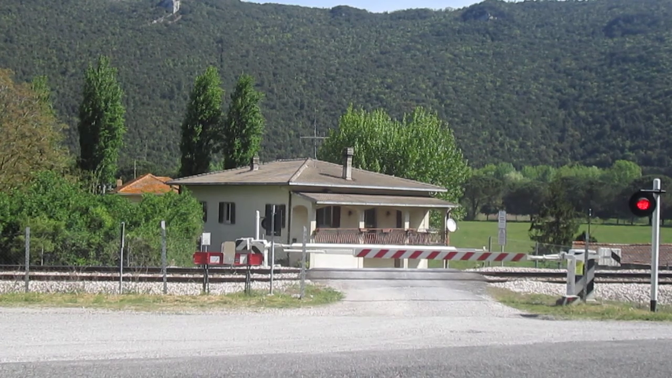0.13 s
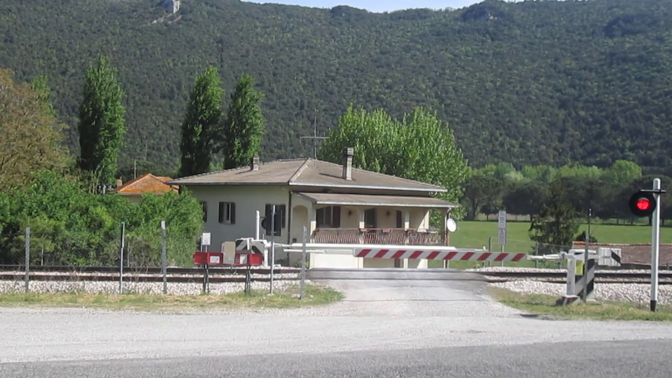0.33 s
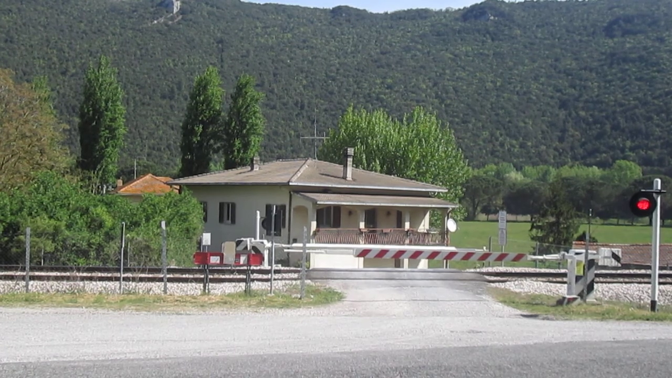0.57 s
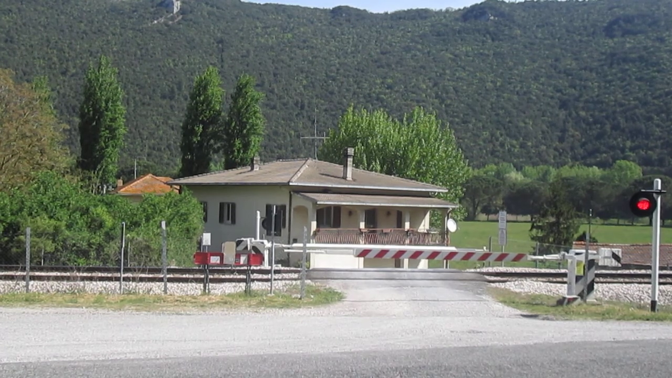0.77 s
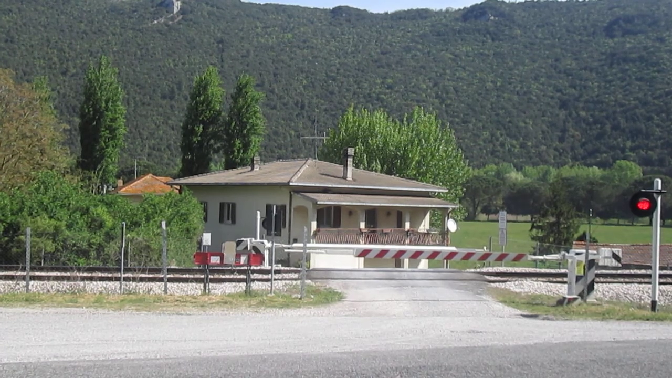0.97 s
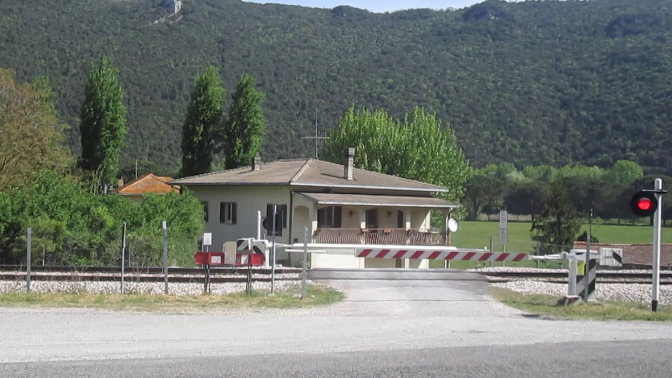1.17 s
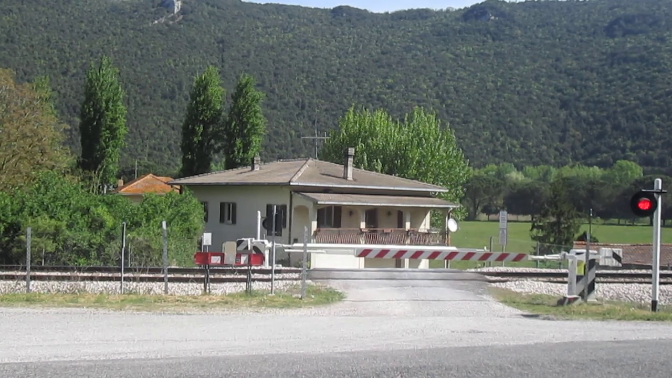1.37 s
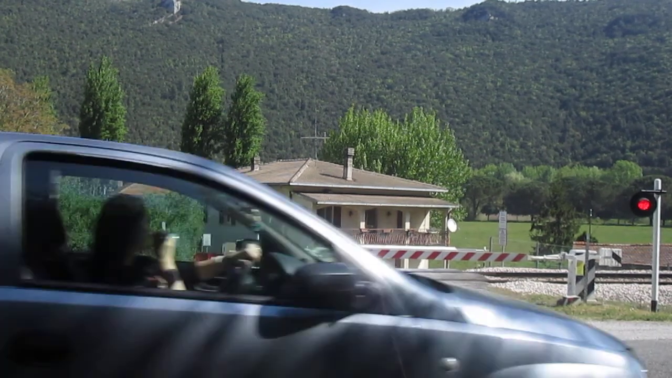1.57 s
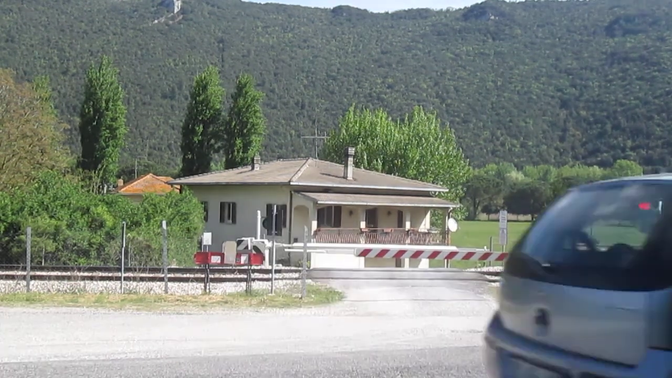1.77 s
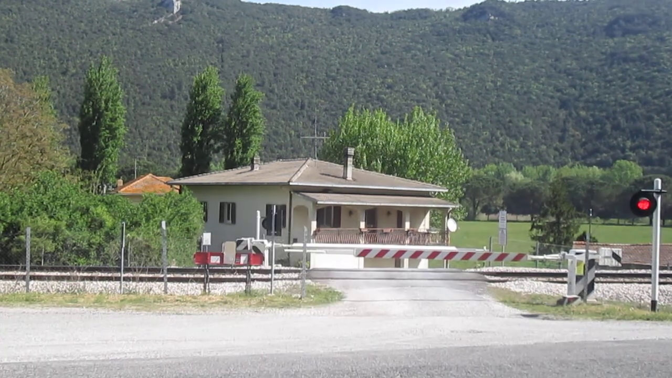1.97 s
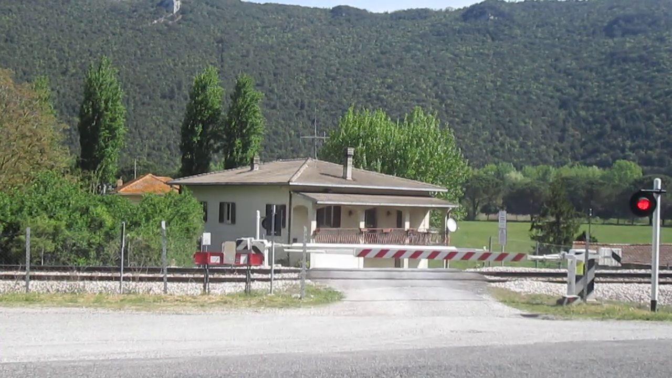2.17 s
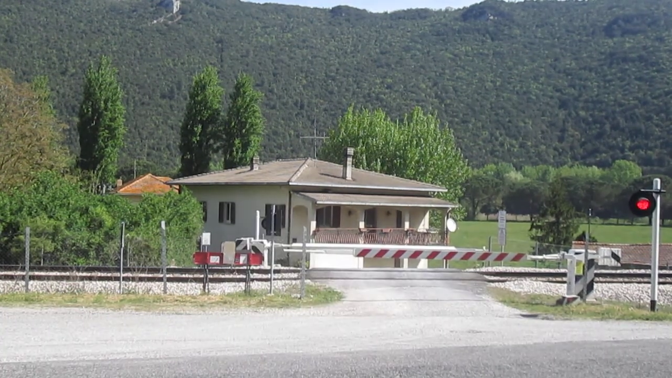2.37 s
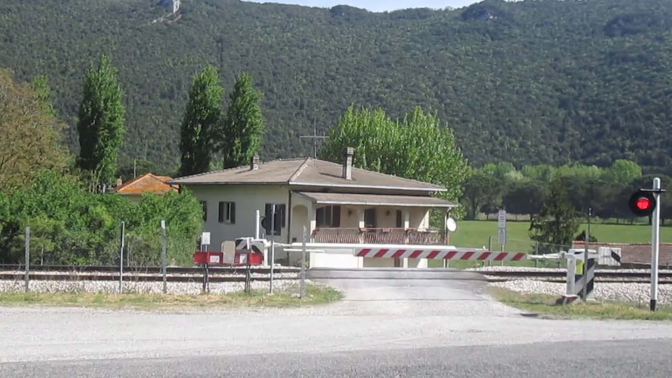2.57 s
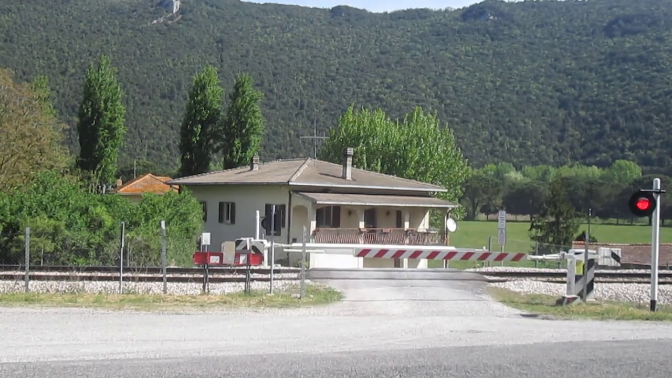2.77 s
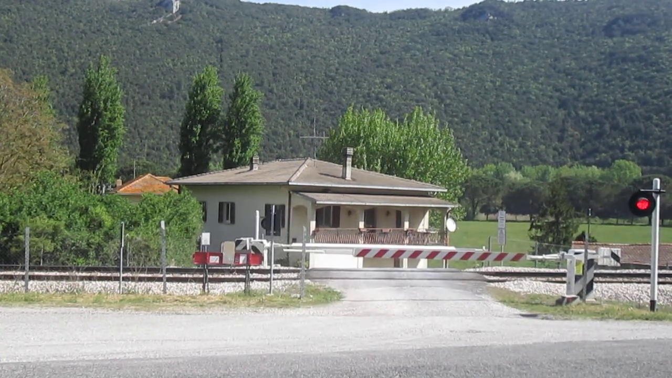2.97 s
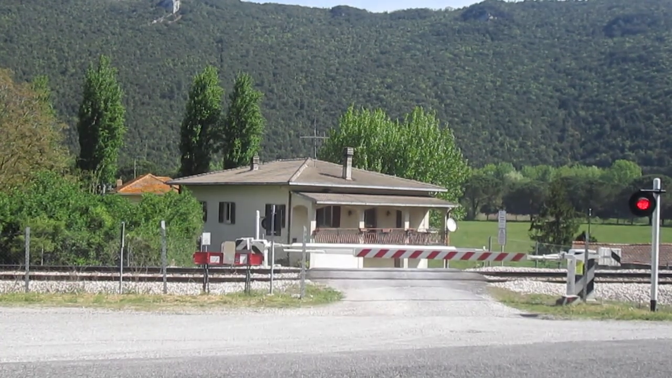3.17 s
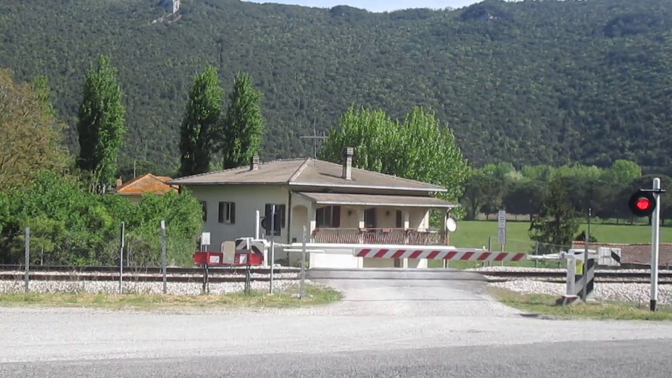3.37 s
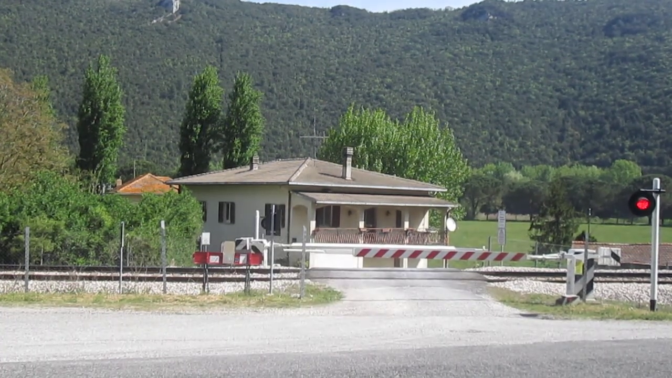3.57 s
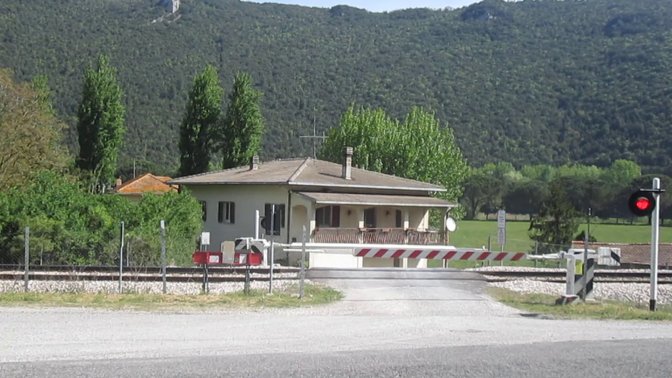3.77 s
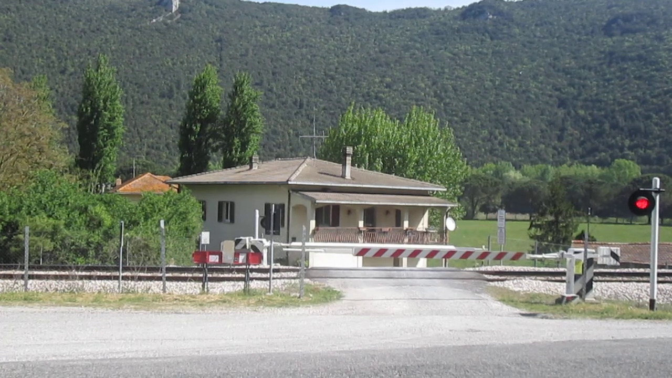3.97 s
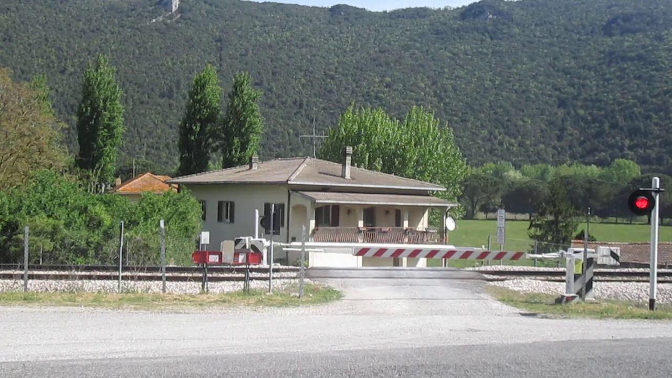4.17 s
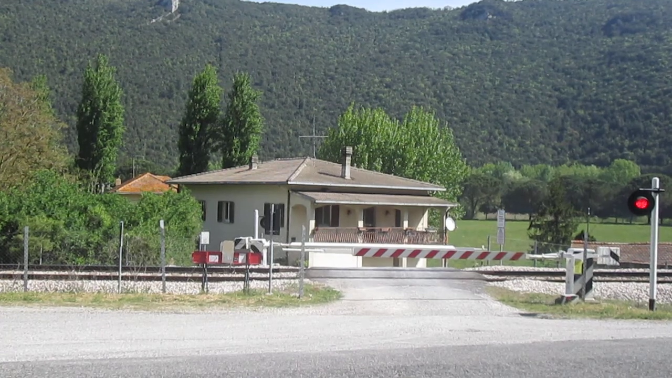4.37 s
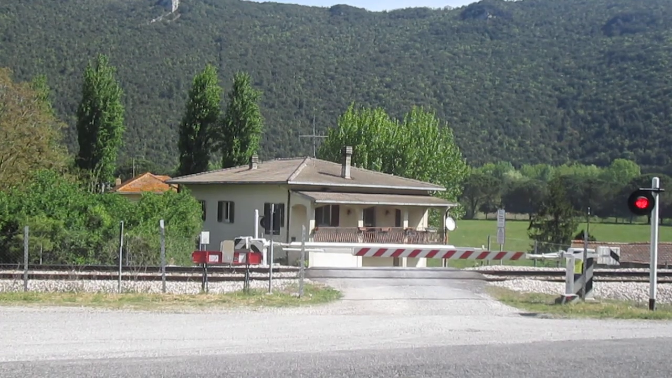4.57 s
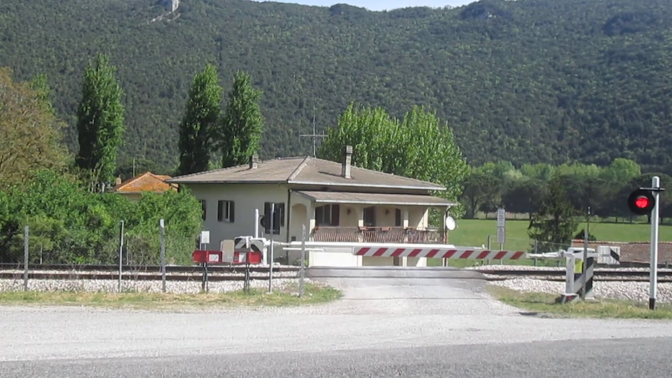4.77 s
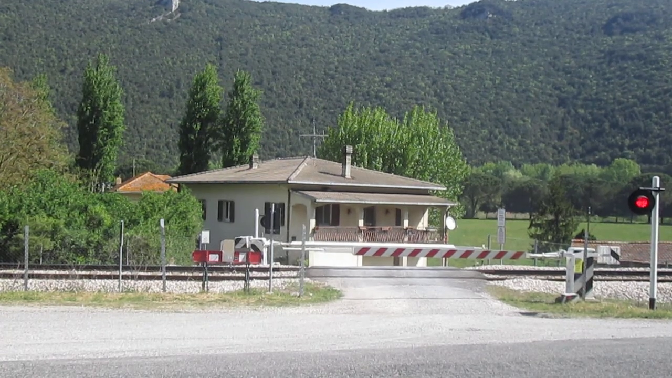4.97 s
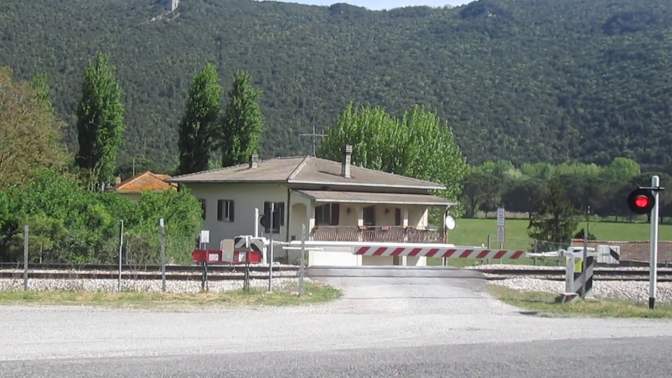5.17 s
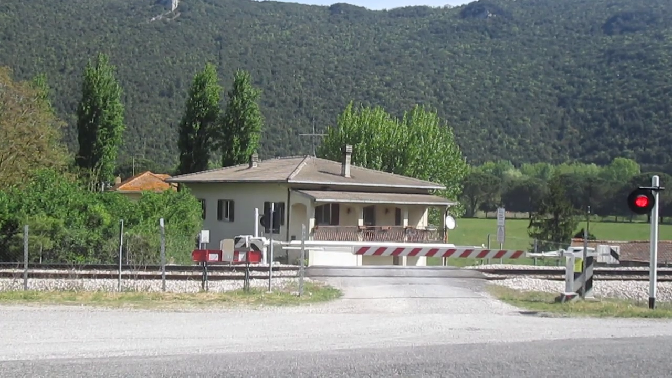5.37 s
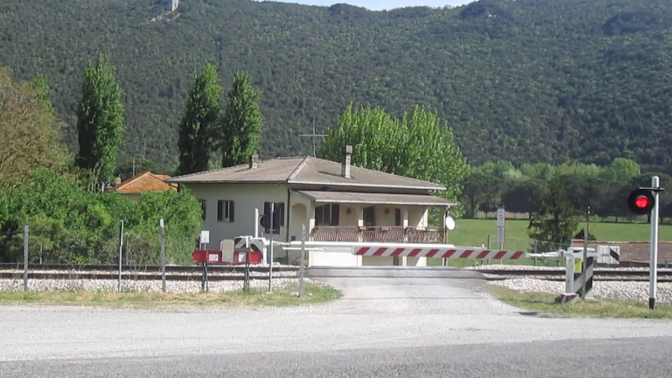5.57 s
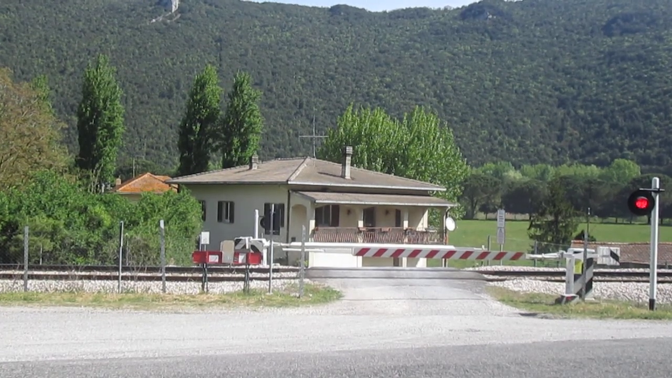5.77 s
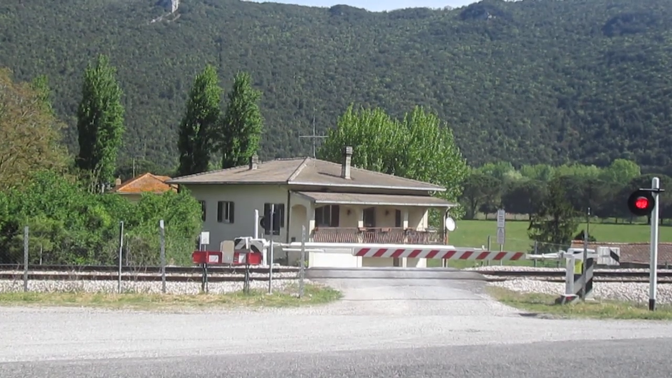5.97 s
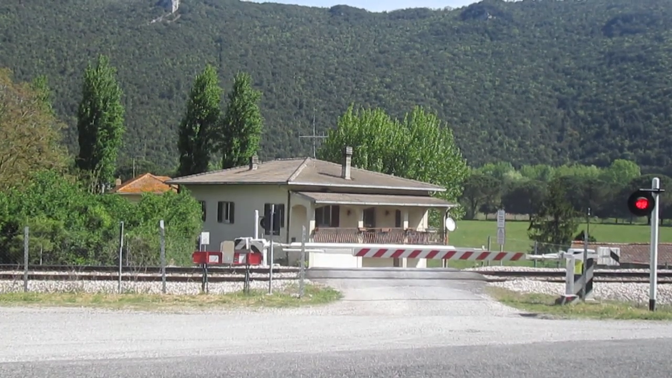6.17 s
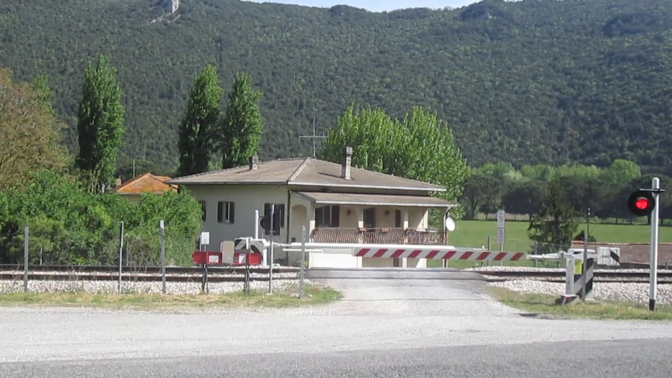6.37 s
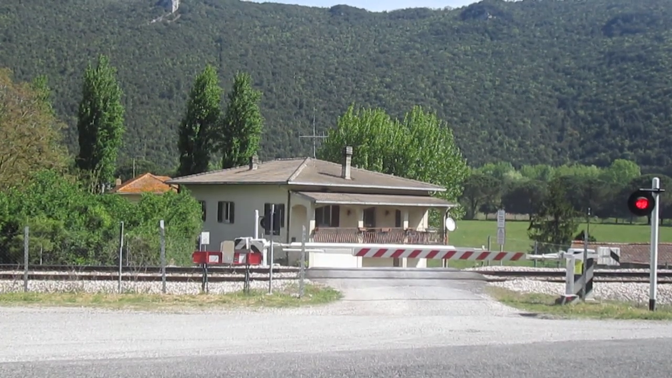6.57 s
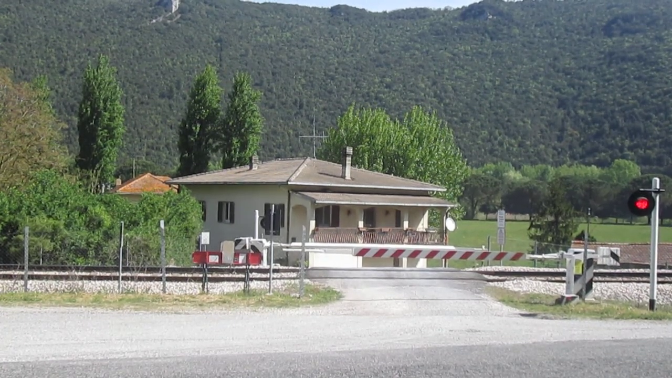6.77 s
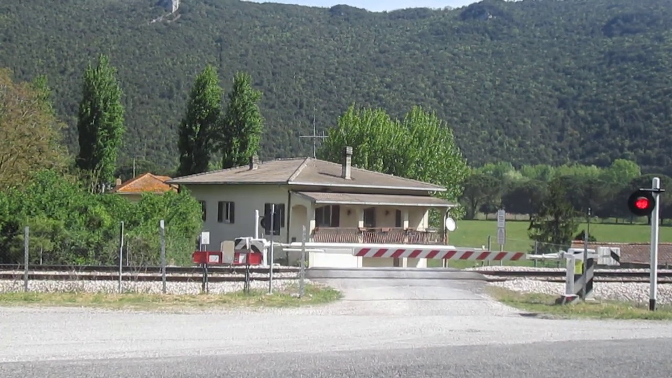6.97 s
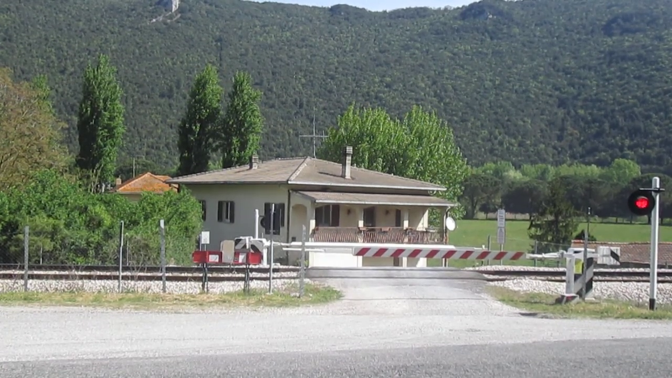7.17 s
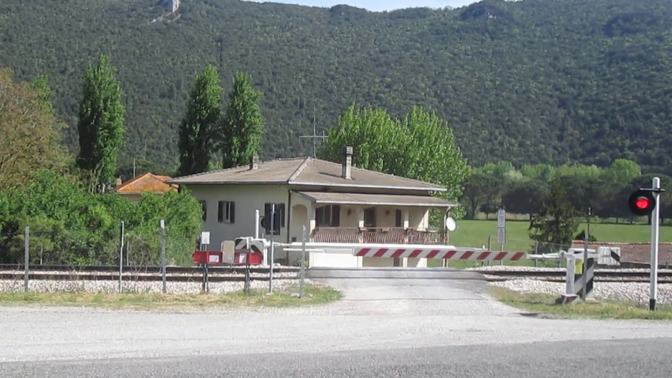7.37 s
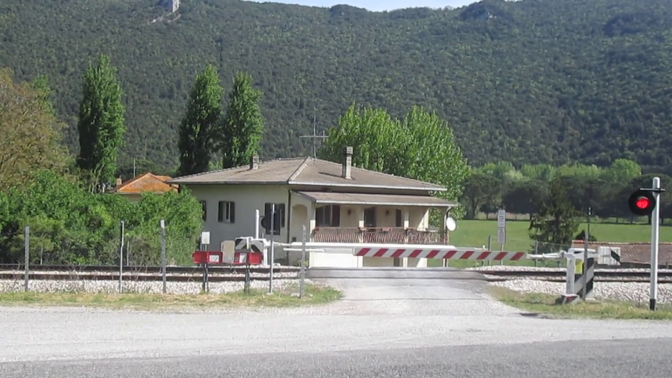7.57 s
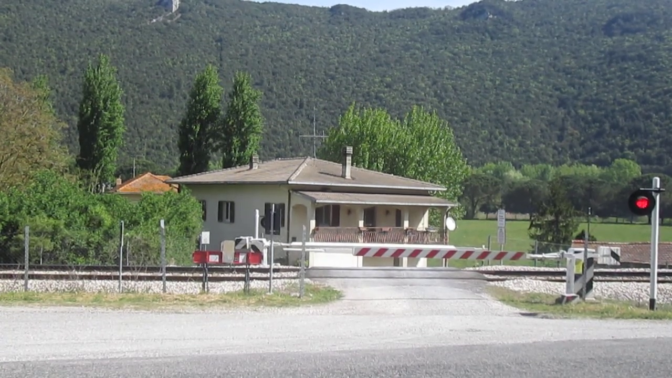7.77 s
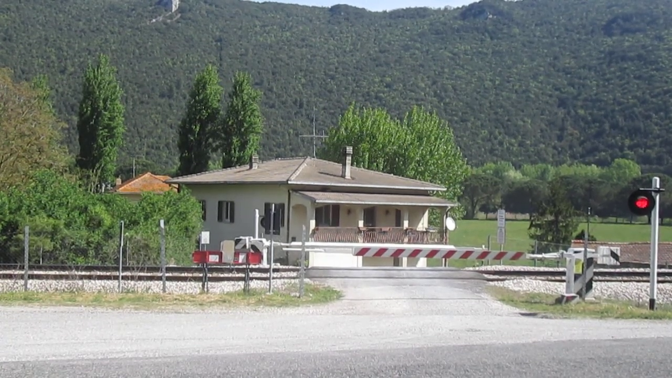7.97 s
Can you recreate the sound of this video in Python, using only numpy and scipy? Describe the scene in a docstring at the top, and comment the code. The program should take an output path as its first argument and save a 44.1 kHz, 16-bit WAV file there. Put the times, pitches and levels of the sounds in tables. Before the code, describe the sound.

Close roadside spot in a quiet valley. A small car is already approaching, its broad tyre roar and low exhaust drone swelling to a peak at about one and a half seconds, then receding with a slight drop in pitch. Soft air thumps brush the microphone. As the car fades, a warbler sings quick clear gliding notes with a hazy echo, over faint hum and distant traffic.

```python
"""A small car passes close by on a country road and drives off: coloured noise makes the tyre roar, turning
as the front, side and rear are heard, over an exhaust drone of Doppler-shifted harmonics.
Windowed low noise makes puffs of air on the microphone. As the car fades, a warbler sings in gliding sines
with echoes, and a farther bird trills in repeated falling chirps.
Behind them are a low sine hum, the shaped noise of the valley and a band of far traffic noise."""
import sys
import numpy as np
from scipy import signal
from scipy.fft import rfft, irfft, next_fast_len
from scipy.io import wavfile
from scipy.ndimage import uniform_filter1d

SR = 44100
rng = np.random.default_rng(int(sys.argv[2]) if len(sys.argv) > 2 else 0)


def put_to_file(sound):
    """Save the sound as 16-bit audio at rate SR, in the file named by the first command-line argument."""
    columns = np.atleast_2d(sound).T  # one column per channel
    safe = np.clip(columns, -1, 1)
    whole_steps = np.round(safe * 32767)
    wavfile.write(sys.argv[1], SR, whole_steps.astype(np.int16))


N = 354555
TIME = np.arange(N) / SR
SIZE = next_fast_len(N, True)
FREQS = np.maximum(np.arange(SIZE // 2 + 1) * SR / SIZE, 1)

# Tyre noise spectra by the side that the car shows. Each row: frequency in Hz, relative level in dB.
COMING_SPECTRUM = [(41, -26.5), (70, -20), (96, -11), (330, -8), (369, -9.5), (422, -9.5), (692, -14.5),
                   (1040, -14.5), (1740, -7), (3900, -41.5), (4360, -38.5), (6250, -46.5), (15000, -77)]
FRONT_SPECTRUM = [(41, -24), (70, -5.5), (103, -19), (246, -7.5), (413, -10.5), (553, -11), (692, -10),
                  (1130, -1.5), (2850, -22), (3990, -30.5), (4360, -27.5), (5970, -32), (15000, -60.5)]
ABREAST_SPECTRUM = [(15, -40), (25, -11), (53, -3), (144, -7), (289, -3), (482, -8.5), (567, -3), (741, -8),
                    (919, -2.5), (1380, -8.5), (2850, -25.5), (3930, -33.5), (4260, -34), (8810, -47.5),
                    (15500, -65)]
REAR_SPECTRUM = [(41, -33), (70, -0.5), (126, -6.5), (235, 5), (422, -8), (483, -1), (618, 0), (847, -10),
                 (1130, 1), (1480, -7), (1660, -4.5), (2130, -7), (3990, -30), (7150, -42), (15000, -63.5)]
LEAVING_SPECTRUM = [(59, -38), (100, -6), (267, -10.5), (307, -3.5), (373, -15.5), (553, 0), (820, -11.5),
                    (979, -0.5), (1190, -9), (1510, -6.5), (1770, -11.5), (2110, -10.5), (3960, -34),
                    (4280, -33), (11000, -55.5), (14300, -84), (22000, -120)]
# Times in seconds at which these five sides, in turn, face the microphone.
SIDE_TIMES_S = [0.351, 1.1, 1.52, 2.0, 3.3]
# Four bands of tyre noise, by name. Each row: level in dB ahead, abreast and behind, all referred to the
# closest distance, then start of screening in seconds, fade in dB per second.
TYRE_BANDS = {"rumble": (-25.3, -21.2, -24.9, 2.6, 5.5), "roar": (-18.8, -15.5, -15.7, 3.22, 11.3),
              "sizzle": (-22.8, -27.4, -26.9, 3.62, 23), "hiss": (-42.7, -45.6, -46.4, 3.2, 10.5)}
# Passing rises and dips of one tyre band. Each row: band name, centre in seconds, half length in seconds,
# change in dB.
TYRE_SWELLS = [("rumble", 0.41, .13, 4.5), ("hiss", 0.99, 0.26, 3.1), ("sizzle", 1.234, 0.19, 3.16),
               ("rumble", 1.425, 0.025, 4.5), ("roar", 1.957, 0.064, -1.6), ("roar", 2.5, 0.06, 1.1),
               ("sizzle", 3.33, 0.4, 3.9)]
# Firing rate at the engine as the driver eases off. Each row: time in seconds, rate in Hz.
FIRING_RATE = [(0, 55.46), (.3, 54.34), (.68, 54.6), (.87, 52.6), (1.35, 53.27), (1.6, 50.4), (2.5, 51),
               (2.87, 49.77)]
# Exhaust drone, a single row: level in dB ahead, abreast and behind, all referred to the closest distance,
# then start of screening in seconds, fade in dB per second.
DRONE_RADIATION = (-20.5, -24.5, -20.5, 2, 1.35)
# Dip of the drone as the body of the car goes by: centre in seconds, half length in seconds, change in dB.
BODY_DIP = (1.635, 0.069, -13)
# Puffs of air on the microphone. Each row: start in seconds, length in seconds, reference frequency in Hz
# (the band lies below it), level in dB before windowing.
AIR_PUFFS = [(1.559, 0.26, 70, -31), (1.954, 0.34, 40, -33.5), (2.209, 0.049, 89.6, -29),
             (2.968, 0.039, 70.4, -32), (3.151, 0.045, 84.4, -28), (4.305, 0.55, 30.07, -49.5),
             (7.813, 0.083, 55.1, -36)]
# The warbler's clear notes. Each row: start in seconds, shape name, length in seconds, pitch in Hz,
# level in dB before the trim of the whole song.
CLEAR_NOTES = [(3.525, "flick", .022, 4590, -58), (3.597, "chip", 0.042, 3400, -54),
               (3.866, "chip", 0.034, 3400, -57), (3.984, "whistle", 0.047, 4060, -60),
               (4.013, "chip", 0.037, 3280, -55), (4.3, "flick", 0.019, 4400, -55),
               (4.335, "chip", 0.032, 3270, -54), (4.6, "whistle", .08, 7350, -73),
               (4.78, "chip", .045, 3140, -56), (4.891, "chip", .038, 3140, -54.5),
               (4.969, "dive", 0.021, 3500, -53), (5.0, "flick", 0.034, 2800, -54),
               (5.055, "flick", 0.035, 3800, -55), (5.119, "arch", 0.077, 6350, -71),
               (5.146, "chip", 0.033, 3350, -52.5), (5.239, "sag", 0.098, 4140, -56),
               (5.367, "scoop", .088, 2295, -54.5), (5.426, "flick", 0.028, 3270, -50.5),
               (5.525, "whistle", .025, 4150, -56), (5.55, "sag", 0.0696, 3330, -50),
               (5.619, "dive", 0.039, 2940, -51), (5.865, "slur", 0.077, 3300, -49.5),
               (5.875, "arch", 0.02015, 4370, -58), (5.955, "whistle", 0.042, 2830, -50),
               (6.06, "slide", 0.13, 2800, -50.5), (6.271, "hook", 0.086, 3300, -51),
               (6.478, "whistle", 0.044, 4190, -57), (6.517, "dive", .02, 3500, -49),
               (6.534, "arch", .068, 2770, -50), (6.589, "arch", 0.034, 3470, -55),
               (6.694, "hook", 0.096, 3296, -49.5), (6.78, "scoop", 0.0602, 2800, -59.5),
               (6.852, "flick", 0.071, 2390, -52.5), (6.887, "arch", 0.044, 3150, -53.5),
               (6.967, "slur", 0.063, 3130, -50), (7.025, "scoop", 0.092, 2070, -60.5),
               (7.151, "whistle", .02, 4270, -55), (7.166, "arch", 0.0762, 2110, -60),
               (7.185, "dive", 0.036, 3350, -53), (7.218, "flick", 0.0235, 3650, -56),
               (7.28, "scoop", .05, 2680, -61.5), (7.344, "whistle", .04, 2990, -55.5),
               (7.492, "whistle", 0.032, 2500, -58), (7.565, "arch", 0.029, 3300, -54.5),
               (7.827, "whistle", .07, 3090, -65), (7.994, "flick", 0.027, 4400, -63)]
# Pitch contours by shape name: semitones about the note's pitch, evenly spread over its length.
NOTE_SHAPES = {"chip": (-2, 1.2, -0.5, -4), "flick": (-2.45, 0, 1.8), "dive": (4.1, 0, -2.6),
               "hook": (3.5, 3.5, 3.5, .1, -0.6, 0, .6), "slur": (0.5, 0.3, -0.9, -6, -6.5),
               "scoop": (1.41, -0.61, -0.98, 0.47, 1.9), "sag": (1.98, 0.63, -0.43, -0.194, .2),
               "slide": (3.2, 1.6, 1, 0.7, -5), "arch": (-1.23, 0.48, -0.05, -1.9),
               "whistle": (0.57, 0, -.2)}
# Soft twitter between the clear notes: start in seconds, end in seconds.
TWITTER_SPAN_S = (4.7, 7.6)
# Spectrum of the open-air background. Each row: frequency in Hz, relative level in dB.
VALLEY_SPECTRUM = [(7.1, -41), (12, -3), (61, -7.5), (82, -3.5), (107, -11.5), (136, -13.5), (324, -12.5),
                   (388, -18), (1040, -24), (2080, -30), (3170, -31.5), (4020, -32), (4400, -36.5),
                   (11500, -49), (15500, -56)]
# Narrow notches in the output. Each row: centre in Hz, width in Hz.
OUTPUT_NOTCHES = [(3938, 190), (7852, 210)]

# the drive: speed, moment of the closest pass, distance of the lane
SPEED_M_S, PASSES_S, LANE_M = 14, 1.516, 3.31
# the car comes out into the open: its level rises until this time
EMERGES_S, EMERGE_DB_PER_S = 0.42, 1


def tyres(rumble_hz=450, roar_hz=1700, hiss_hz=3300, wheel_hz=6.9, throb_db=0.12, patchy_db=0.5):
    """Broadband rolling noise: four bands radiate with their own directivity and a colour for each side."""
    # (name, band that it fills, band that sets its loudness)
    parts = [("rumble", band(20, rumble_hz), band(55, rumble_hz)),
             ("roar", band(rumble_hz, roar_hz), 1),
             ("sizzle", band(roar_hz, hiss_hz), 1),
             ("hiss", band(hiss_hz, SR / 2), band(5050, 12000))]
    spectra = (COMING_SPECTRUM, FRONT_SPECTRUM, ABREAST_SPECTRUM, REAR_SPECTRUM, LEAVING_SPECTRUM)
    sides = [colour(points) for points in spectra]
    shares = [np.interp(TIME, SIDE_TIMES_S, row) for row in np.eye(len(sides))]
    rolling = np.zeros(N)
    for name, span, core in parts:
        # independent noises crossfade at equal power
        turning = sum(np.sqrt(share) * noise(side * span, core) for side, share in zip(sides, shares))
        swells_db = sum(bump_db(*row) for part, *row in TYRE_SWELLS if part == name)
        rolling += undb(heard_db(*TYRE_BANDS[name]) + swells_db) * turning
    # the wheels throb once a turn and roll over uneven asphalt
    throb = throb_db * np.sin(2 * np.pi * wheel_hz * TIME)
    return rolling * undb(throb + patchy_db * walk(28))


def exhaust(overtone_db=-21, uneven_db=1.0, speed_of_sound_m_s=343):
    """Periodic firing gives a harmonic series, whose Doppler shift drops in pitch as the car goes by."""
    firing_hz = np.interp(TIME, *np.transpose(FIRING_RATE))
    _, bearing = drive()
    heard_hz = firing_hz / (1 + bearing * SPEED_M_S / speed_of_sound_m_s)
    phase = 2 * np.pi * np.cumsum(heard_hz * (1 + 0.0061 * walk(8.3))) / SR
    overtones = sum(np.sin(k * phase + rng.uniform(0, 2 * np.pi)) for k in range(2, 6))
    drone = np.sin(phase) + undb(overtone_db) * overtones
    level_db = heard_db(*DRONE_RADIATION) + bump_db(*BODY_DIP) + uneven_db * walk(11)
    return unit(drone) * undb(level_db)


def drive():
    """Straight-line motion: distance (m) and bearing cosine, -1 as it comes, 0 abreast, +1 as it leaves."""
    along_m = SPEED_M_S * (TIME - PASSES_S)
    distance_m = np.hypot(along_m, LANE_M)
    return distance_m, along_m / distance_m


def heard_db(ahead_db, abreast_db, behind_db, screened_s, fade_db_per_s):
    """Directivity, spherical spreading (pressure as 1 / distance) and screening set the level heard."""
    distance_m, bearing = drive()
    end_db = np.where(bearing < 0, ahead_db, behind_db)
    beam_db = abreast_db + (end_db - abreast_db) * bearing ** 2
    spreading_db = 20 * np.log10(distance_m / LANE_M)
    screen_db = fade_db_per_s * np.maximum(TIME - screened_s, 0)
    emerging_db = EMERGE_DB_PER_S * np.maximum(EMERGES_S - TIME, 0)
    return beam_db - spreading_db - screen_db - emerging_db


def bump_db(centre_s, half_s, db):
    """A Gaussian in time makes a smooth passing rise or dip in level."""
    return db * np.exp(-((TIME - centre_s) / half_s) ** 2)


def puffs():
    """Turbulent pressure: the car's wake and the breeze push on the microphone as bursts of low noise."""
    out = np.zeros(N)
    for start_s, length_s, hz, db in AIR_PUFFS:
        window = np.hanning(int(length_s * SR))
        air = noise(band(hz / 2, hz * 0.93, order=3))[:len(window)]
        window_rms = np.sqrt(np.mean(window ** 2))
        add(out, start_s, undb(db) * unit(air * window) * window_rms)
    return out


def warbler(trim_db=0.5, pure_s=0.063, echo_db=-4.0, echo_t60_s=0.75, off_pitch_db=-0.74):
    """Frequency modulation: gliding sines, scratchier when short, each leaving a haze of echoes."""
    waver, rasp, flutter_db, edge = 0.007, 0.03, 3, 0.2  # edge: share of the note at either end
    dry, wobble, flutter = np.zeros(N), walk(314), undb(flutter_db * walk(140))
    for start_s, shape, length_s, pitch_hz, db in CLEAR_NOTES + twitter():
        u = np.linspace(0, 1, int(length_s * SR))
        at = np.minimum(int(start_s * SR) + np.arange(len(u)), N - 1)
        steps = NOTE_SHAPES[shape]
        contour = np.interp(u, np.linspace(0, 1, len(steps)), steps)
        semitones = uniform_filter1d(contour, len(u) // len(steps))
        # notes shorter than pure_s gain extra pitch jitter
        scratch = waver + rasp * max(1 - length_s / pure_s, 0)
        hz = pitch_hz * 2 ** (semitones / 12) * (1 + scratch * wobble[at])
        envelope = np.sin(np.pi / 2 * np.minimum(np.minimum(u, 1 - u) / edge, 1))
        # a note is loudest on its own pitch and changes by off_pitch_db per semitone away from it
        note_db = db + trim_db + off_pitch_db * np.abs(semitones)
        tone = np.sin(2 * np.pi * np.cumsum(hz) / SR)
        add(dry, start_s, undb(note_db) * envelope * flutter[at] * tone)
    return dry + undb(echo_db) * scattered(dry, echo_t60_s)


def twitter(count=34, mean_length_s=0.026, pitch_hz=3250, spread=0.1294, untrimmed_db=-62.5):
    """Random timing and pitch: soft short notes from the same repertoire, loosely spaced through the song."""
    slots, names = np.linspace(*TWITTER_SPAN_S, count + 1), list(NOTE_SHAPES)
    spacing_s = slots[1] - slots[0]
    notes = []
    for slot_s, (late, pick, long, high) in zip(slots, rng.random((count, 4))):
        shape = names[int(pick * len(names))]
        note_hz = pitch_hz * (1 + spread * (2 * high - 1))
        notes.append((slot_s + spacing_s * late, shape, mean_length_s * (0.5 + long), note_hz, untrimmed_db))
    return notes


def far_trill(db=-60.48, rate_hz=14, top_hz=5700, bottom_hz=3700, blur_t60_s=0.6):
    """Repeated downward sweeps: a second bird's quick chirps, heard only as scattered by the trees."""
    phrase = np.interp(TIME, [4.95, 5.12, 5.33, 5.62], [0, 1, 1, 0])
    u = (rate_hz * TIME) % 1
    hz = top_hz + (bottom_hz - top_hz) * u
    chirps = phrase * np.sin(np.pi * u) ** 2 * np.sin(2 * np.pi * np.cumsum(hz) / SR)
    return undb(db) * scattered(chirps, blur_t60_s)


def scattered(x, t60_s, build_s=0.0058):
    """Diffuse reverberation: sound thrown back by trees and walls builds up, then decays exponentially."""
    t = TIME[:SR]
    decay = np.exp(-np.log(1000) * t / t60_s)
    tail = rng.standard_normal(SR) * decay * (1 - np.exp(-t / build_s))
    return signal.fftconvolve(x, tail / np.linalg.norm(tail))[:N]


def hum(pitch_hz=83.3, start_db=-51.4, grows_s=5.4, growth_db_per_s=2.2, waver=0.0019, waver_db=0.5):
    """A nearly steady sinusoid, like an engine idling some way off, that later slowly grows."""
    db = start_db + growth_db_per_s * np.maximum(TIME - grows_s, 0)
    phase = 2 * np.pi * np.cumsum(pitch_hz * (1 + waver * walk(1.8))) / SR
    return unit(np.sin(phase)) * undb(db + waver_db * walk(6))


def valley(air_db=-54.5, swell_db=0.4, traffic_db=-60):
    """Stationary shaped noise of the open air, joined by a slowly growing band of far traffic."""
    air = noise(colour(VALLEY_SPECTRUM), band(135, 1800)) * undb(air_db + swell_db * walk(1))
    traffic = noise(band(260, 334, order=3)) * np.interp(TIME, [4.5, 6.5], [0, 1])
    return air + undb(traffic_db) * traffic


def undb(db):
    """The decibel is logarithmic: turn it into an amplitude gain."""
    return 10 ** (np.asarray(db) / 20)


def unit(x):
    """Mean-square normalisation: scale to rms 1."""
    return x / np.sqrt(np.mean(x ** 2))


def colour(points):
    """Spectral shaping: gain per frequency, interpolated in dB over log frequency from (Hz, dB) points."""
    hz, db = np.transpose(points)
    return undb(np.interp(np.log(FREQS), np.log(hz), db))


def band(lo_hz, hi_hz, order=6):
    """Butterworth magnitude response: gain per frequency of a band with steep skirts."""
    below = 1 + (lo_hz / FREQS) ** (2 * order)
    above = 1 + (FREQS / hi_hz) ** (2 * order)
    return (below * above) ** -0.5


def noise(gain, within=1):
    """Filtered white noise: it takes the given colour, and its part inside a band has rms 1."""
    white = rfft(rng.standard_normal(SIZE))
    return irfft(white * gain, SIZE)[:N] / np.sqrt(np.mean((gain * within) ** 2))


def walk(rate_hz):
    """Band-limited random fluctuation: a control up to about rate_hz with spread 1."""
    return noise(band(rate_hz / 10, rate_hz, order=2))


def add(out, start_s, sound):
    """Superposition: mix a short sound in at its time."""
    i = int(start_s * SR)
    out[i:i + len(sound)] += sound[:max(N - i, 0)]


def scene():
    """Linear superposition of all sources at one roadside spot."""
    car = tyres() + exhaust()
    birds = warbler() + far_trill()
    return (car + puffs() + birds + hum() + valley())[None]


def record(dry, top_hz=15700):
    """Linear filtering: resonant notches remove narrow bands and an elliptic low-pass cuts the top."""
    for hz, width_hz in OUTPUT_NOTCHES:
        dry = signal.lfilter(*signal.iirnotch(hz, hz / width_hz, fs=SR), dry)
    return signal.sosfilt(signal.ellip(10, 0.2, 80, top_hz, fs=SR, output="sos"), dry)


dry = scene()
out = record(dry)
put_to_file(out)
```